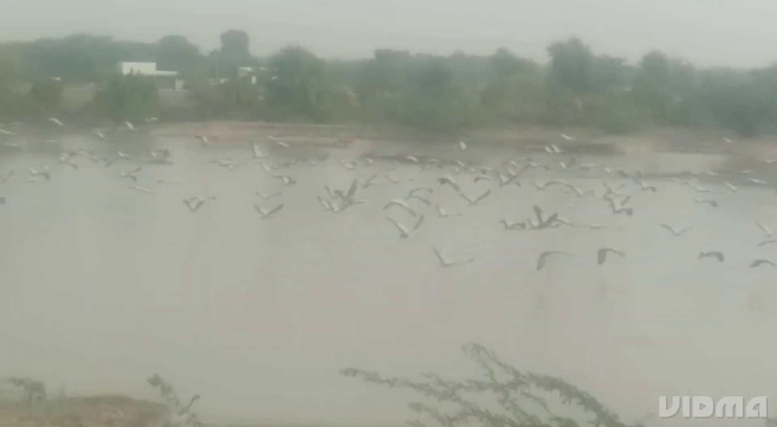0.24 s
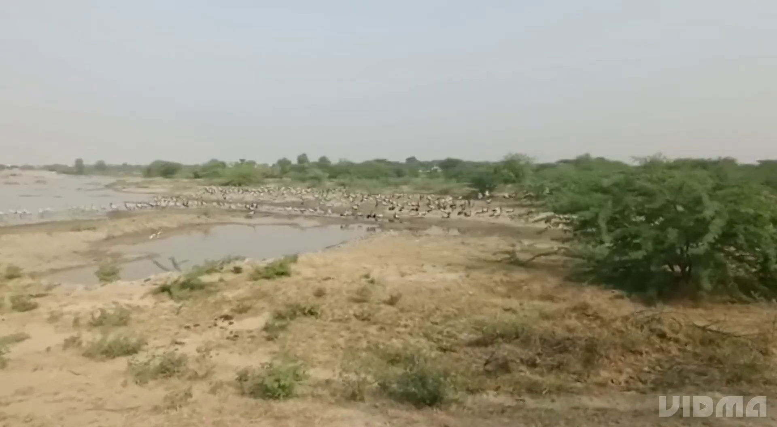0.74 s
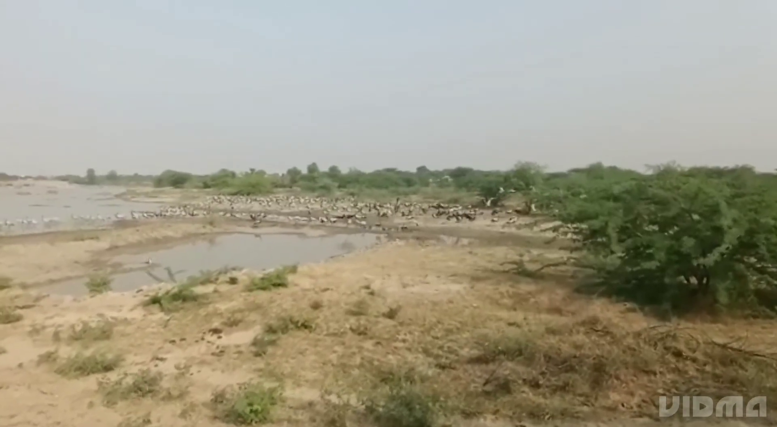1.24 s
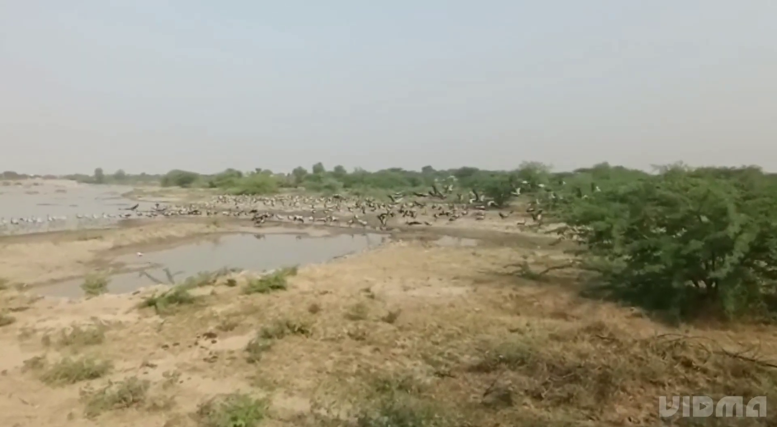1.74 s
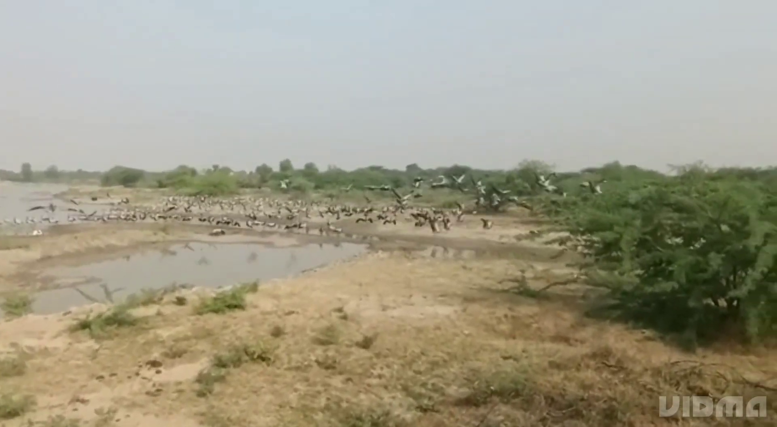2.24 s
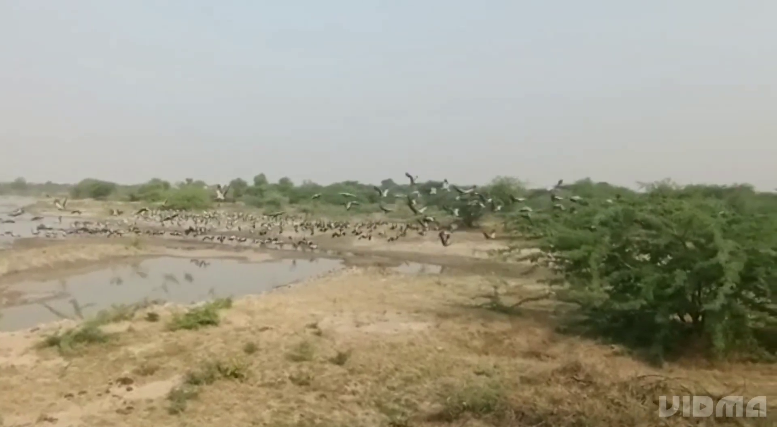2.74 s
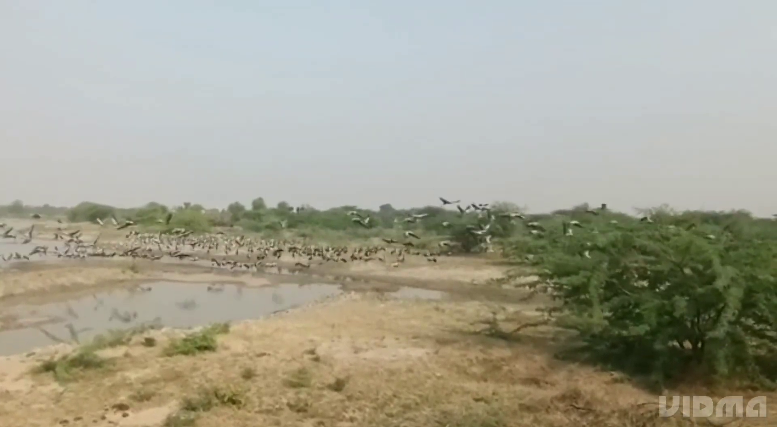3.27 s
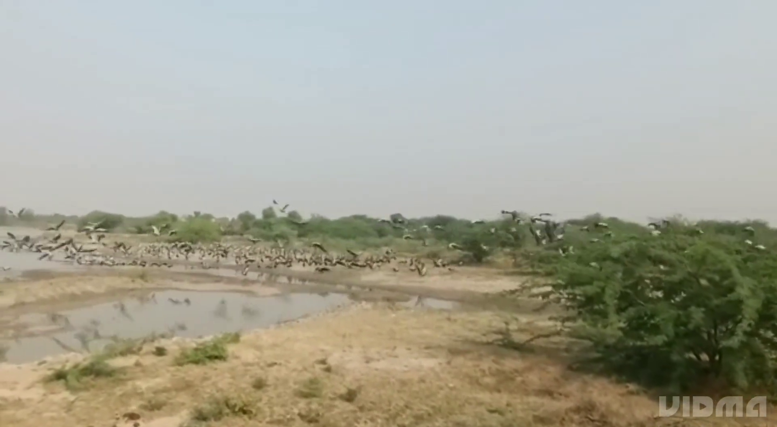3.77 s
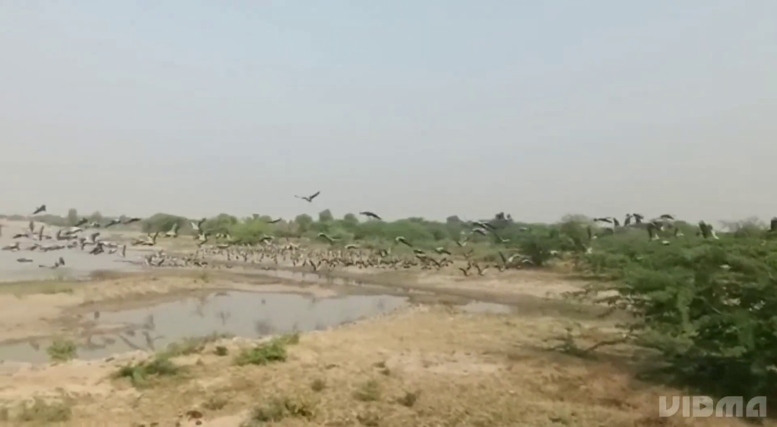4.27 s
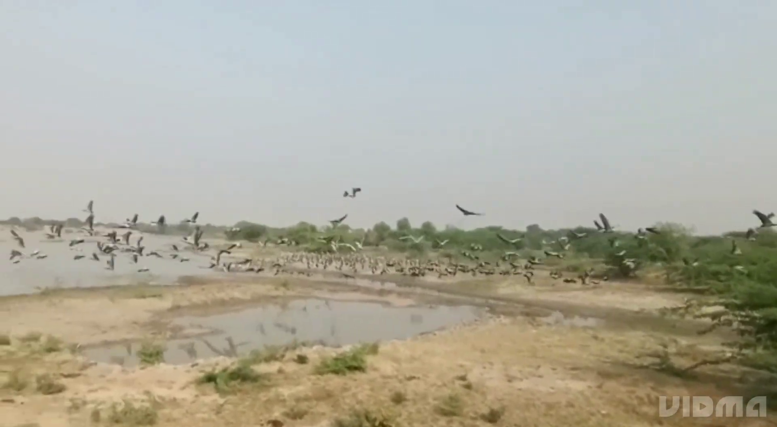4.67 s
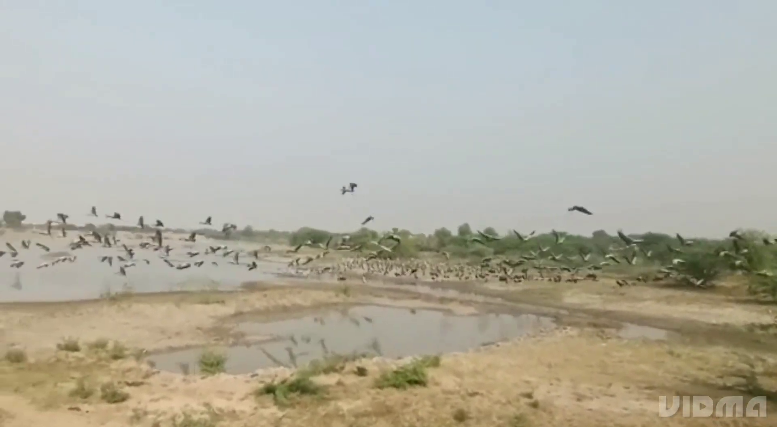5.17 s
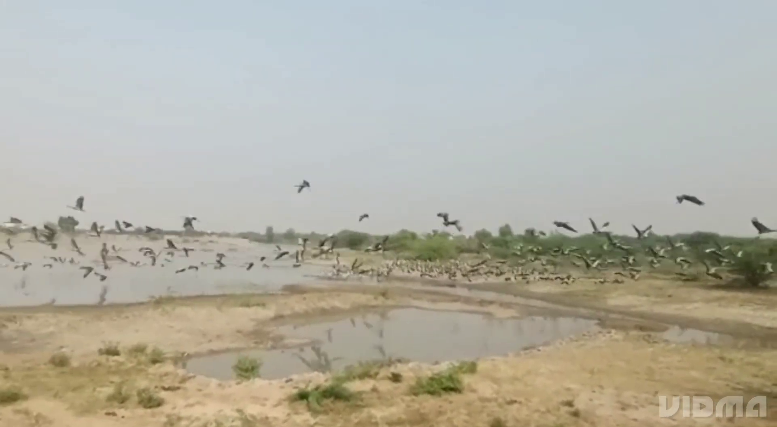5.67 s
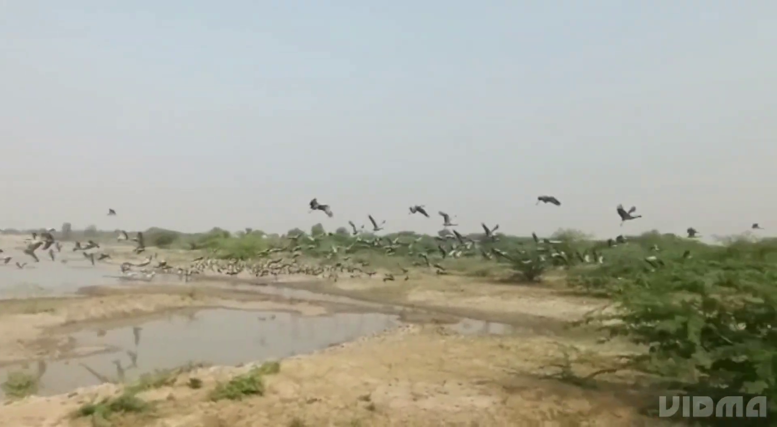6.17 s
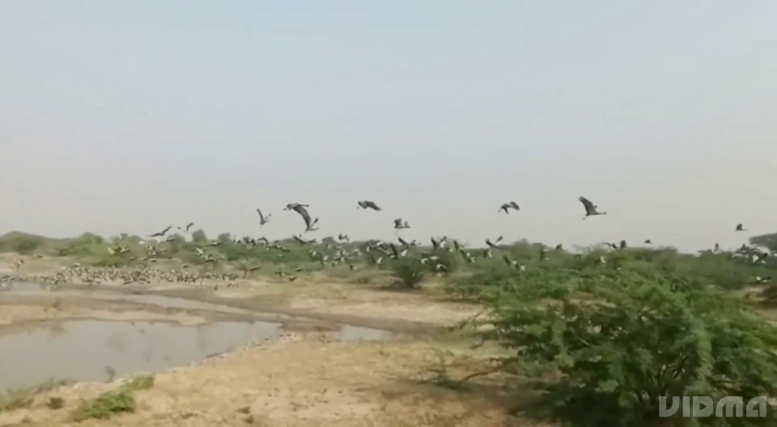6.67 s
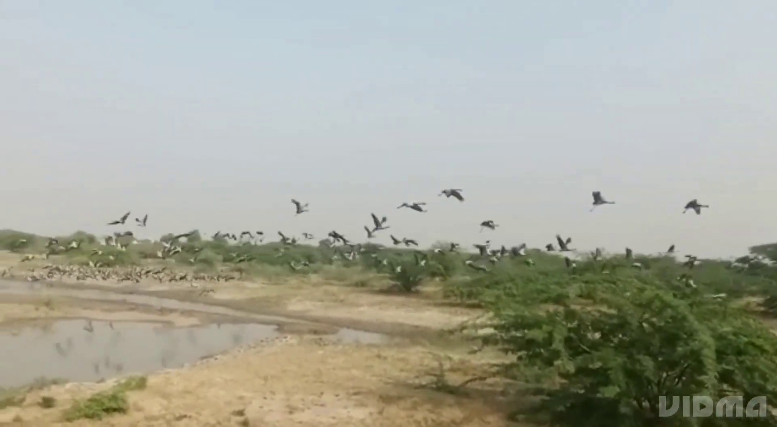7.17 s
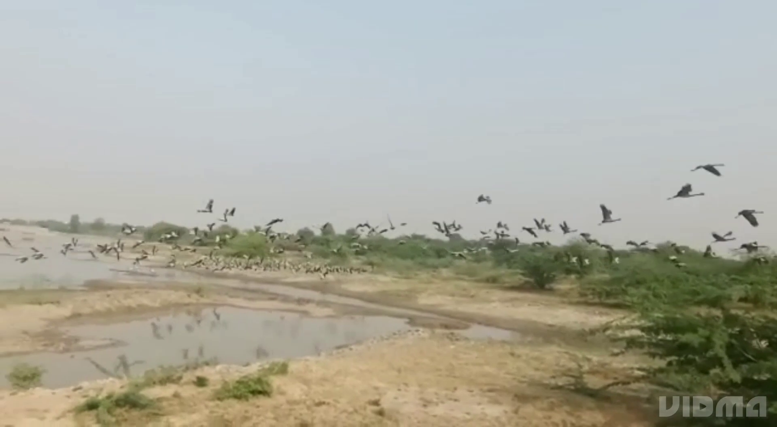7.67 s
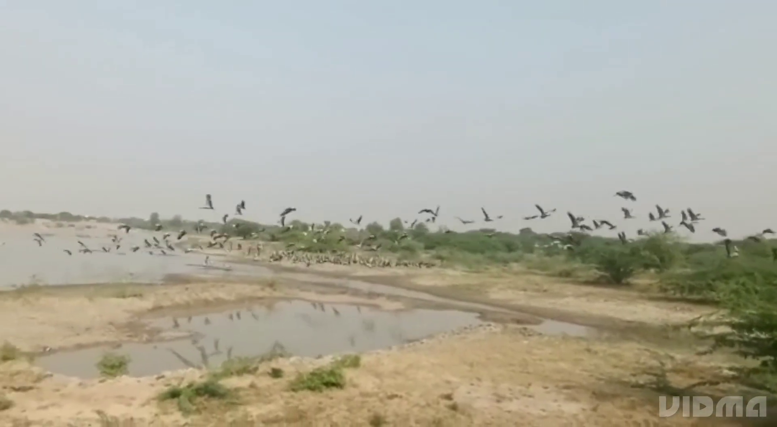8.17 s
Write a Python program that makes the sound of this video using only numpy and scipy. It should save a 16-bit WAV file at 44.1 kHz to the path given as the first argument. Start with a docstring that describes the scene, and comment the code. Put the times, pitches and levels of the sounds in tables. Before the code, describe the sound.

At 0 s a short, falling croak sounds over a faint low hum and soft open-air hush, followed by weak croaks and thin peeps. Around 0.42-0.5 s the level plunges almost to silence, then returns quietly with a small whistle. Near 1.1-1.2 s a few clipped croaks sound, and more scattered ones until 2.3 s, while the hum swells slightly. From about 2.4 s the crane flock breaks out: fast rolled croaks, sharp notes running into sinking rattles, strong near 3.1 s. From 3.3 s hoarse, wobbling trumpets overlap them, thick at 4.2-5.5 s, with distant birds answering in bouts. Calls continue in uneven bursts through 6-7 s. Young birds' high quavering whistles cluster around 7-8.1 s among more trumpets, and calling continues to the end at roughly 8.4 s. Short dull shore echo, wide stereo, occasional soft low thumps on the microphone.

```python
"""A short falling croak over a faint low hum opens the scene; a big flock of cranes calls in growing density.
Adults give rolled croaks (sharp notes into a falling rattle) and hoarse trumpets; young birds whistle.
Croaks are pulsed overtone series, trumpets wobbling overtone series, whistles frequency-modulated sines.
Distant birds answer in bouts; filtered noise makes hum and air, windowed sines make soft thumps.
The level dips briefly near 0.4 s. Table levels precede group trims and channel colour."""
import sys
import numpy as np
from scipy import signal
from scipy.fft import rfft, irfft, next_fast_len
from scipy.io import wavfile
from scipy.ndimage import uniform_filter1d

SR = 44100
rng = np.random.default_rng(int(sys.argv[2]) if len(sys.argv) > 2 else 0)


def persist_wave(psi):
    """Save psi, clipped to +-1, as 16-bit WAV."""
    counts = np.round(np.clip(psi, -1, 1) * 32767).astype(np.int16)
    wavfile.write(sys.argv[1], SR, np.atleast_2d(counts).T)


N = 371322
TIME = np.arange(N) / SR
TOP_HZ = 15900


def undb(db):
    """Decibels to gain."""
    return 10 ** (np.asarray(db) / 20)


def unit(x):
    """Scale to rms 1."""
    return x / np.sqrt(np.mean(x ** 2) + 1e-18)


def curves(table):
    """Each column after the first as a line through time."""
    s, *columns = np.transpose(table)
    return [np.interp(TIME, s, c) for c in columns]


def gain_at(hz, colour):
    """Gain of a (hz, db) spectrum, interpolated over log frequency."""
    f, db = np.transpose(colour)
    return undb(np.interp(np.log(hz + 1e-9), np.log(f), db))


def tint(x, colour):
    """Zero-phase filter with a (hz, db) spectrum."""
    size = next_fast_len(N + 4096)
    gain = gain_at(np.fft.rfftfreq(size, 1 / SR), colour)
    return irfft(rfft(x, size) * gain, size)[..., :N]


def wander(size, rate_hz):
    """Smooth random curve: normal draws at rate_hz, joined by sine-squared ramps."""
    place = np.arange(size) / SR * rate_hz
    points = np.random.default_rng(rng.integers(1 << 30)).standard_normal(int(place[-1]) + 2)
    k = place.astype(int)
    ramp = np.sin(np.pi / 2 * (place - k)) ** 2
    return points[k] + (points[k + 1] - points[k]) * ramp


def swell(u, rise, fall):
    """Sine onset and fade over the shares `rise` and `fall` of a call."""
    return np.sin(np.pi / 2 * np.clip(u / rise, 0, 1)) * np.sin(np.pi / 2 * np.clip((1 - u) / fall, 0, 1))


def add(out, start_s, sound, lag_s=0.000858, lag_spread_s=.00016, pan_db=1.0):
    """Place a source: it reaches the left port later, by a bearing-dependent lag, with a random pan."""
    bearing, side = rng.standard_normal(2)
    paths = [(lag_s + lag_spread_s * bearing, pan_db * side), (0, -pan_db * side)]
    for channel, (late_s, db) in enumerate(paths):
        start = int(np.clip((start_s + late_s) * SR, 0, N))
        part = sound[:N - start]
        out[channel, start:start + len(part)] += part * undb(db)


# Hush of open country: hz, density_db (per Hz, relative)
AIR_COLOUR = [(30, 1), (200, 4.5), (450, 6.5), (700, 3.5), (1300, -13), (2000, -5), (2900, -1),
              (4000, -1.5), (6500, -5), (8000, -13.5), (15000, -48)]


def air(level_db=-70, waver_db=1.0):
    """Hush of open country: coloured stereo noise with a slightly wavering level."""
    hush = unit(tint(rng.standard_normal((2, N)), AIR_COLOUR))
    return hush * undb(level_db + waver_db * wander(N, 12.0))


# Low hum: start_s, low_part_level_db, upper_part_level_db
HUM_LEVELS = [(0.0, -67, -71), (0.25, -79, -72), (0.42, -99, -99), (0.53, -99, -99), (1.3, -76.5, -71),
              (1.62, -65.5, -67.5), (1.96, -64, -68), (2.4, -62.5, -65), (3.101, -65.5, -65.5),
              (3.49, -60.5, -66), (4.04, -66.5, -70), (4.62, -72, -75), (4.9, -73, -74),
              (8.3, -82.5, -81.5)]
# Low part of the hum: hz, density_db (per Hz, relative)
HUM_LOW_COLOUR = [(25, -38.5), (60, -29), (100, -11), (155, 5.5), (210, -2.5), (280, -23), (400, -22),
                  (900, -52)]
# Upper part of the hum: hz, density_db (per Hz, relative)
HUM_UPPER_COLOUR = [(100, -37), (170, -3), (230, 3), (300, -7.5), (400, -42), (560, -19), (720, 10.5),
                    (900, -34), (2000, -57)]


def low_hum(trim_db=5, side_db=-10, waver_db=5.0):
    """Faint hum: two bands of nearly mono noise, each with a wavering level."""
    out = np.zeros((2, N))
    for colour, level_db in zip([HUM_LOW_COLOUR, HUM_UPPER_COLOUR], curves(HUM_LEVELS)):
        mid, side = rng.standard_normal((2, N))
        stereo = mid + undb(side_db) * side * np.array([[1], [-1]])
        out += unit(tint(stereo, colour)) * undb(level_db + trim_db + waver_db * wander(N, 20))
    return out


RING_WIDTH_HZ = 640


def voice(cycles, hz, throat, treble_db, ring_hz=0, ring_db=0, own_db=3.0):
    """Syrinx overtones weighted by each bird's own windpipe: one wave period read at the given phase."""
    size = 2048
    overtones = hz * np.arange(1, int(TOP_HZ / hz) + 1)
    weights = gain_at(overtones, throat) * gain_at(overtones, [(1600, 0.0021), (4500, treble_db)])
    weights = weights * undb(ring_db * np.exp(-((overtones - ring_hz) / RING_WIDTH_HZ) ** 2))
    own_level, own_phase = rng.standard_normal((2, 40))[:, :len(weights)]
    spectrum = weights * undb(own_db * own_level) * np.exp(1.2j * own_phase)
    shape = irfft(np.r_[0, spectrum], size)
    return np.interp(cycles % 1 * size, np.arange(size), shape)


# Windpipe overtone weighting in croaks: hz, gain_db
RATTLE_THROAT = [(1300, 2.5), (2600, -6.5), (3800, -11), (5000, -8.5), (6700, -6), (8000, -24),
                 (10500, -28.5), (13500, -50.5), (15000, -34.5)]


def croak(hz, treble_db, fray=0, gap=0.85, pulse_hz=152, slowing=1.2, jitter=0.03495,
          waver=0.052, uneven_db=1.5, snap_share=0.32):
    """The syrinx snaps open unevenly, slower as pitch sinks: overtones crack briefly, low tone rings on."""
    size = len(hz)
    bird_rate = 1 + .07 * rng.standard_normal()
    rate_hz = pulse_hz * (hz / hz[0]) ** slowing * bird_rate * np.exp(jitter * wander(size, 110.04))
    p = np.cumsum(rate_hz) / SR % 1  # phase within a pulse
    rasp = (.022 + .1 * fray) * wander(size, 1100)
    cycles = p * hz / rate_hz + rasp + waver * wander(size, 166.0)
    tone = voice(cycles, hz[0], RATTLE_THROAT, treble_db)
    body = uniform_filter1d(tone, size=9)
    ring = unit(np.sin(np.pi * p ** 0.83) ** gap)  # larger gap: shorter ring
    snap = unit((p / snap_share) ** 2 * np.exp(-2 * p / snap_share))
    return unit((body * ring + (tone - body) * snap) * undb(uneven_db * wander(size, 146.4)))


NOTE_GAP_S = .032


def note(hz, treble_db, fade_s):
    """One sharp note: a short croak with falling pitch and Gaussian fade, scaled to peak 1."""
    t = np.arange(int(NOTE_GAP_S * SR)) / SR
    envelope = np.exp(-((t - .003) / fade_s) ** 2) * swell(t / t[-1], 0.13, 0.15)
    sound = croak(hz * (1 - 3.09 * t), treble_db) * envelope
    return sound / np.abs(sound).max()


def rattle(length_s, first_hz, last_hz, treble_db, roll_hz=31, roll_depth=0.38):
    """Merged notes: a throbbing croak that frays as the pitch falls."""
    u = np.linspace(0, 1, int(length_s * SR))
    throb = 1 + roll_depth * (1 - u) * np.sin(2 * np.pi * roll_hz * length_s * u)
    sound = croak(first_hz + (last_hz - first_hz) * u ** 2, treble_db, u ** 4, gap=0.73)
    return unit(sound * throb * swell(u, 0.03, 0.26))


NOTE_PEAK_DB, NOTE_TREBLE_DB = 11, 6.5  # relative to the rattle
NOTE_FADE_S, NOTE_STRETCH_S_PER_S = .013, 0.017
CLIMB_PER_S, RATTLE_SAG_PER_S = 0.88, 1.195  # shares of pitch


def roll(notes, rattle_s, hz, treble_db):
    """Evenly spaced notes lengthen and climb in pitch, then merge into a rattle that sinks."""
    lead_s = round(notes) * NOTE_GAP_S
    out = np.zeros(int((lead_s + rattle_s + NOTE_GAP_S) * SR))
    parts = []
    if rattle_s * SR > 2:
        last_hz = hz * (1 - RATTLE_SAG_PER_S * rattle_s)
        parts.append((lead_s, rattle(rattle_s, hz, last_hz, treble_db)))
    for s in np.arange(round(notes)) * NOTE_GAP_S:
        note_hz = hz * (1 - CLIMB_PER_S * (lead_s - s))
        fade_s = NOTE_FADE_S + NOTE_STRETCH_S_PER_S * s
        parts.append((s, note(note_hz, treble_db + NOTE_TREBLE_DB, fade_s) * undb(NOTE_PEAK_DB)))
    for s, part in parts:
        out[int(s * SR):][:len(part)] += part
    return out


# Near rolled croaks: start_s, note_count, rattle_s, pitch_hz, level_db, treble_db
ROLLS = [(0, 0, 0.042, 1380, -39.5, -34), (0.165, 0, .12, 1475, -48, -14.5),
         (0.297, 0, 0.068, 1304, -51.5, -11), (.596, 0, 0.038, 1180, -50, -10),
         (1.056, 1, 0, 1325, -53, -27), (1.108, 1, 0, 1310, -55, -13), (1.132, 1, 0.01, 1370, -38.5, -6.5),
         (1.165, 1, 0, 1354, -36, -5.5), (1.195, 1, 0, 1266, -44, 5.5), (1.479, 1, 0.0023, 1290, -56, -26),
         (1.521, 0, 0.0083, 1331, -44.5, -9), (1.552, 1, 0.13, 1403, -43.5, -12),
         (1.767, 1, 0, 1335, -47, -15), (1.96, 1, 0.012, 1460, -42, -24), (2.121, 0, 0.05, 1300, -46, -14),
         (2.334, 1, 0.0066, 1405, -44, 13), (2.366, 1, 0, 1477, -31, -11),
         (2.416, 4, 0.0013, 1593, -28.5, -6.5), (2.593, 1, 0.00075, 1210, -28, -6.5),
         (2.629, 2, 0.0077, 1329, -41, -3), (2.688, 0, 0.04, 1190, -28.5, -7),
         (2.711, 1, 0.047, 1260, -36.5, 6), (2.816, 1, 0.045, 1416, -35, -7),
         (2.883, 4, 0, 1360, -32, -4.5), (3.037, 1, 0.0026, 1205, -32, -3),
         (3.071, 4, 0.003, 1375, -23.5, -0.5), (3.198, 1, 0.067, 1347, -25.5, -9.5),
         (3.317, 4, 0.029, 1458, -36, -5), (3.575, 2, 0.041, 1443, -39.5, -14.5),
         (3.728, 1, 0.062, 1312, -31.5, -17), (4.101, 3, 0.041, 1470, -41, -11),
         (4.214, 4, 0.063, 1388, -28, -3.5), (4.383, 5, 0.043, 1478, -29.5, -4),
         (4.601, 2, 0.021, 1492, -30.5, 2), (5.077, 1, 0.062, 1487, -30.5, -11),
         (5.186, 2, 0.012, 1444, -27.5, -12), (5.265, 1, 0, 1384, -28.5, -4.5),
         (5.299, 1, 0.024, 1340, -31, -14), (5.349, 1, 0.0042, 1353, -27.5, -8),
         (5.386, 2, 0.076, 1456, -26, -4), (5.742, 4, 0.093, 1443, -31, -10),
         (6.138, 1, 0.067, 1457, -28.5, -16), (6.328, 0, 0.11, 1177, -28, 2.5),
         (6.366, 3, 0.053, 1363, -29, 1.5), (7.094, 1, 0, 1390, -38.5, -1),
         (7.126, 0, 0.16, 1432, -35.5, -0.5), (7.229, 1, 0.011, 1363, -27, -14),
         (7.267, 2, 0.15, 1391, -27.5, -11), (7.581, 0, 0.15, 1640, -36.5, 4.5),
         (8.349, 0, 0.16, 1458, -31.5, -30)]


def near_rolls(trim_db=1):
    """Rolled croaks of the near adults, from syrinx pulses."""
    out = np.zeros((2, N))
    for start_s, notes, rattle_s, hz, level_db, treble_db in ROLLS:
        add(out, start_s - .0015, roll(notes, rattle_s, hz, treble_db) * undb(level_db + trim_db))
    return out


def far_roll(length_s, pitch, treble_db, rattle_hz=1400):
    """A distant bird's roll: one note and a rattle."""
    return roll(1, length_s - NOTE_GAP_S, rattle_hz * (1 + .1 * pitch), treble_db)


def far_trumpet(length_s, pitch, treble_db, trumpet_hz=960, drop=.83, hoarse=0.56):
    """A distant bird's hoarse, sinking trumpet."""
    hz = trumpet_hz * (1 + .2 * pitch)
    return trumpet(length_s, hz, drop * hz, treble_db, hoarse, hz * rng.uniform(1, 3))


def chorus(call, wave_db, colour, treble_db, count=108, excitement=0.73, usual_db=-34, scatter_db=2.0):
    """Many distant birds give one kind of call, brighter when louder, blurred by the way across the shore."""
    out = np.zeros((2, N))
    for k, (when, long, pitch, loud) in enumerate(rng.uniform(-1, 1, (count, 4))):
        start_s = max(0, (k + when) / count * TIME[-1] - .05)
        length_s = .13 + 0.04484 * long
        middle = min(N - 1, int((start_s + length_s / 2) * SR))
        harder_db = np.clip(wave_db[middle] - usual_db, -20, 6)
        sound = call(length_s, pitch, treble_db + excitement * harder_db)
        add(out, start_s, sound * undb(scatter_db * loud))
    out = tint(shore(out), colour)
    # level out the sum before imposing the bouts
    loudness = np.sqrt(uniform_filter1d(np.mean(out ** 2, axis=0), SR // 16) + 1e-3)
    return out / loudness * undb(wave_db)


# Bouts of distant calls: start_s, length_s, level_db, trumpeter_share (0-1)
BOUTS = [(0, 0.56, -52, 0.3), (2.326, 0.15, -39.5, 0.15), (2.424, 0.19, -32, 0.6),
         (2.633, 0.44, -34.5, 0.28), (3.181, 0.18, -31.5, 0.19), (3.268, 0.21, -33.5, 0.8),
         (3.382, 0.68, -49.5, 0.35), (3.657, 0.24, -31, 0.48), (4.082, 0.18, -33.5, 0.77),
         (4.199, 0.65, -31, 0.47), (4.834, 0.87, -41.5, 0.5), (5.083, 0.29, -33, 0),
         (5.395, 0.18, -30.5, 0.03), (5.663, 0.18, -34.5, 0.52), (5.722, 0.35, -29.5, 0.27),
         (6.035, 0.26, -37, 0.27), (6.286, 0.23, -28, 0.19), (6.51, 0.39, -59, 0.25),
         (6.661, 0.2, -29, 0.83), (6.802, 1.9, -42, 0.34), (7.106, 0.19, -38, 0),
         (7.265, 0.21, -28.5, 0.07), (7.454, 0.28, -38.5, 0.38), (7.73, 0.21, -33, 0.96),
         (7.936, 0.16, -33, 0.93), (8.175, 0.41, -34, 0.28)]
BOUT_ATTACK_S, BOUT_RELEASE_S = 0.03, 0.059  # birds join in faster than they drop out
MURMUR_DB = -73  # flock between bouts


def bouts():
    """Rolling and trumpeting levels in dB: each bout swells, holds and dies away over a faint murmur."""
    power = np.outer([.8, .2], np.full(N, undb(MURMUR_DB) ** 2))
    for start_s, length_s, level_db, share in BOUTS:
        attack_end_s = start_s + min(BOUT_ATTACK_S, length_s / 2)
        release_s = start_s + max(length_s - BOUT_RELEASE_S, length_s / 2)
        corners_s = [start_s, attack_end_s, release_s, start_s + length_s]
        share = np.clip(share, 0, 1)
        envelope = np.interp(TIME, corners_s, [0, undb(level_db), undb(level_db), 0])
        power += np.outer([1 - share, share], envelope ** 2)
    return 10 * np.log10(power)


# Summed distant rolls: hz, gain_db
FAR_ROLL_COLOUR = [(700, -0.5), (1000, 7.5), (1350, -1), (1950, 13), (2500, 5.5), (3200, -2.5), (5000, 3),
                   (9000, -2.5), (15000, -0.5)]
# Summed distant trumpets: hz, gain_db
FAR_TRUMPET_COLOUR = [(600, 4), (950, -2), (1400, 10), (2000, -3), (2600, -2), (3300, 4.5), (5000, 1),
                      (9000, 6.5), (15000, -6)]


def flock(roll_db=2.5, trumpet_db=4.0):
    """The rest of the flock: a rolling and a trumpeting chorus, summed."""
    rolling_db, trumpeting_db = bouts()
    rolling = chorus(far_roll, rolling_db, FAR_ROLL_COLOUR, treble_db=0.0)
    trumpeting = chorus(far_trumpet, trumpeting_db, FAR_TRUMPET_COLOUR, treble_db=-0.5)
    return rolling * undb(roll_db) + trumpeting * undb(trumpet_db)


# Soft thumps on the microphone: start_s, pitch_hz, level_db
THUMPS = [(0.039, 130, -54), (0.224, 124.4, -55.5), (0.319, 147, -53), (1.201, 92, -58),
          (3.016, 151.4, -47), (4.551, 156, -47)]


def thumps(length_cycles=4.9):
    """Soft thumps: a few cycles of a low sine under a Hann window."""
    out = np.zeros((2, N))
    for start_s, hz, level_db in THUMPS:
        t = np.arange(int(length_cycles / hz * SR)) / SR
        add(out, start_s, unit(np.sin(2 * np.pi * hz * t) * np.hanning(len(t))) * undb(level_db))
    return out


def whistle(length_s, first_hz, middle_hz, last_hz, hoarse=0, overtone_db=-20, quaver=0.012, flutter_hz=210):
    """A thin, quavering peep; throat flutter splits a hoarse one into side tones."""
    u = np.linspace(0, 1, int(length_s * SR))
    hz = np.polyval(np.polyfit([0, .5, 1], [first_hz, middle_hz, last_hz], 2), u)
    flutter = np.sin(2 * np.pi * flutter_hz * length_s * u + wander(len(u), 80))
    flutter = flutter + .6 * wander(len(u), 500)
    phase = 2 * np.pi * np.cumsum(hz * (1 + quaver * wander(len(u), 420))) / SR + 1.5 * hoarse * flutter
    tone = np.sin(phase) + undb(overtone_db) * np.sin(2 * phase)
    return unit(tone * undb(5.4 * wander(len(u), 170)) * swell(u, 0.06, 0.15))


# Whistles of young birds: start_s, length_s, first_hz, middle_hz, last_hz, level_db, hoarseness (0-1)
WHISTLES = [(.17, 0.15, 3930, 3740, 3530, -59, 0.4), (0.051, 0.13, 2900, 2800, 2660, -62.5, 0.6),
            (0.497, 0.095, 3180, 2900, 3100, -46, 0.32), (0.673, 0.035, 2740, 3010, 3100, -56.5, 0.1),
            (1.993, 0.069, 3030, 3220, 3880, -42.5, 0.37), (2.045, 0.037, 2790, 2520, 2370, -52.5, 0.1),
            (2.421, 0.088, 3490, 3400, 2800, -36.5, 0.1), (3.391, 0.096, 4290, 4030, 3430, -44, 0.3),
            (3.487, 0.09, 2725, 2595, 2600, -50.5, 0.2), (4.341, 0.067, 4120, 3270, 3140, -38, 0.5),
            (4.961, 0.066, 3100, 3770, 3360, -36.5, 0), (5.009, 0.039, 3330, 3550, 4000, -37, 0.1),
            (5.059, 0.047, 3273, 2996, 2850, -41, 0.08), (6.24, 0.085, 3002, 3275, 3350, -48, 0.2),
            (6.571, 0.054, 3017, 2880, 2746, -52, 0.3), (6.924, 0.068, 3070, 3160, 3260, -46, 0.1),
            (6.983, 0.065, 3300, 3380, 3680, -39, 0.1), (6.997, 0.062, 3370, 3110, 3070, -46, 0),
            (7.054, 0.0532, 3740, 3660, 3360, -47, 0.2), (7.517, 0.059, 3950, 3760, 3730, -41.5, 0),
            (7.734, 0.062, 3450, 3500, 3350, -42, 0.3), (7.802, 0.14, 3370, 3140, 2974, -36.5, 0.4),
            (7.852, 0.059, 3480, 3320, 3150, -43, 0.4), (7.944, 0.045, 2830, 2760, 2670, -42, 0.4),
            (7.94, .07, 4350, 4370, 4150, -46, 0.8), (8, 0.09, 4020, 3880, 3920, -37, 0.5),
            (7.949, 0.13, 3790, 3540, 3360, -42.5, 0.4), (8.079, 0.082, 3900, 3930, 3620, -43.5, 0.5)]


def young_whistles(trim_db=2):
    """Peeps of the young birds: gliding, fluttering near-sines."""
    out = np.zeros((2, N))
    for start_s, length_s, first_hz, middle_hz, last_hz, level_db, hoarse in WHISTLES:
        sound = whistle(length_s, first_hz, middle_hz, last_hz, hoarse)
        add(out, start_s, sound * undb(level_db + trim_db))
    return out


# Faint low tones from far off: start_s, length_s, pitch_hz, level_db
FAR_TONES = [(0.076, 0.17, 335, -60), (.24, 0.205, 345, -66.5), (0.91, 0.063, 643, -50)]


def far_tones():
    """Faint, quavering low tones whose pitch sags at the end."""
    out = np.zeros((2, N))
    for start_s, length_s, hz, level_db in FAR_TONES:
        add(out, start_s, whistle(length_s, hz, hz, .96 * hz) * undb(level_db))
    return out


# Windpipe overtone weighting in trumpets: hz, gain_db
TRUMPET_THROAT = [(700, 7.5), (1000, 1), (1700, 1), (2500, -2), (3300, -10), (4800, -0.5), (6700, -4.5),
                  (8000, -23.5), (13500, -42), (15000, -42)]
RING_DB = 7  # boost of overtones near a windpipe resonance


def trumpet(length_s, first_hz, last_hz, treble_db, hoarse, ring_hz, flap_depth=0.62, uneven_db=4.5, tire_db=4):
    """A sagging tone catches and wobbles; hoarse membranes shake and flap about every three cycles."""
    u = np.linspace(0, 1, int(length_s * SR))
    hoarse = np.clip(hoarse, 0, 1)
    sag = u ** rng.uniform(1.2, 2.4)
    wobble = 1 + (.006 + .013 * hoarse) * wander(len(u), 80)
    cycles = np.cumsum((first_hz + (last_hz - first_hz) * sag) * wobble) / SR
    flap = np.sin(2 * np.pi * cycles / rng.uniform(2.8, 4) + wander(len(u), 90))  # adds side tones
    scatter = .014 * wander(len(u), 900) + .08 * wander(len(u), 190) + .05 * flap
    tone = voice(cycles + hoarse * scatter, first_hz, TRUMPET_THROAT, treble_db, ring_hz, RING_DB)
    shake = undb(uneven_db * np.sqrt(hoarse) * wander(len(u), 194.3))
    shake = shake * (1 + flap_depth * np.sqrt(hoarse) * flap)
    catch = 1 + .38 * np.clip(wander(len(u), 70), -2, 1.3)
    return unit(tone * shake * catch * undb(-tire_db * sag) * swell(u, 0.11, 0.15))


# Near trumpets: start_s, length_s, pitch_hz, sag_per_s (share), level_db, treble_db,
# hoarseness (clipped to 0-1), ring_hz
TRUMPETS = [(1.979, 0.046, 821, 0.78, -34, -4.5, 0.4, 1630), (2.525, 0.14, 850, 1.88, -31, -18, 0.9, 1699),
            (2.634, 0.072, 848, 0.95, -38.5, 7.5, 0.7, 2500),
            (3.284, 0.12, 916, 0.57, -34, -15, 0.72, 2720),
            (3.375, 0.15, 796, 1.31, -34.5, 1.5, 0.77, 1446),
            (3.678, 0.046, 926, 0.24, -30.5, 10, 0.2, 2880), (3.734, .11, 1042, 1.45, -36, -8, 0.47, 3150),
            (3.774, 0.17, 894, 1.65, -32, -5, 0.94, 1010), (3.927, 0.053, 1692, 1.9, -33.5, -3, 0.09, 1650),
            (4.264, 0.13, 808, 0.93, -34, -7, 0.65, 1277), (4.446, 0.17, 1008, 1.4, -33.5, 12, 0.5, 1000),
            (4.616, .13, 868, 1.56, -29, 5.5, 0.84, 2500), (4.757, 0.17, 963, 1.02, -29.5, -7, 0.77, 1000),
            (4.878, 0.15, 932, 0.94, -37, -1.5, 0.3, 900), (4.96, 0.14, 895, 2, -41, -16, 0, 850),
            (5.106, 0.051, 1408, 1, -39, -14, 0.23, 1400), (5.147, 0.073, 770, 0.99, -33.5, -12, 0, 780),
            (5.2, 0.1, 1480, 1.6, -28, -5, 0.04, 1400), (5.281, 0.087, 1227, 0.81, -32.5, -8, 0, 1200),
            (5.83, .15, 1540, 1.284, -32.5, -12, 0.65, 1446),
            (5.918, 0.16, 1206, 1.2, -33.5, -2, 1.02, 2380),
            (6.093, 0.15, 1202, 0.68, -32.5, -2.5, 0.56, 2360), (6.33, 0.1, 1175, 0.63, -31, 5, 0.65, 1190),
            (6.449, 0.084, 1266, 1.26, -30, -22, 0.5, 1180),
            (6.666, 0.13, 1011, 0.74, -30.5, -0.5, 0.45, 1400),
            (6.69, 0.11, 872, 0.94, -34.5, -4, 0.56, 1700), (6.743, 0.15, 831, 1.2, -30.5, -2.5, 0.38, 860),
            (6.776, 0.14, 1350, 0.79, -35.5, -12, 0.13, 3940),
            (6.873, 0.12, 871, 1.5, -35, -16.5, 0.37, 880), (7.488, 0.1, 1191, 0.43, -32, 4, 0.27, 4762),
            (7.503, 0.11, 1099, 2, -32, 0, 0.38, 2220), (7.639, 0.12, 1221, 1.1, -37.5, 11, 0.45, 2400),
            (7.739, 0.124, 1006, 0.86, -30, -7.5, 0.54, 1713),
            (7.82, 0.12, 818.4, 0.34, -28.5, -6.5, 0.58, 1660),
            (7.85, 0.12, 860, 2.34, -31.5, -12, 0.72, 750),
            (7.99, 0.109, 1246, 1.74, -32.5, -11.5, 0.45, 1100),
            (8.189, 0.109, 1328, 1.83, -31.5, 1, 0, 1300)]


def near_trumpets(trim_db=0):
    """Hoarse trumpets of the near adults, coloured by the windpipe."""
    out = np.zeros((2, N))
    for start_s, length_s, hz, sag_per_s, level_db, treble_db, hoarse, ring_hz in TRUMPETS:
        last_hz = hz * (1 - sag_per_s * length_s)
        sound = trumpet(length_s, hz, last_hz, treble_db, hoarse, ring_hz)
        add(out, start_s, sound * undb(level_db + trim_db))
    return out


def shore(x, echo_db=-11, t60_s=0.23):
    """Ground and bushes scatter a short, dull echo: convolution with decaying noise."""
    t = np.arange(SR // 3) / SR
    tail = rng.standard_normal((2, len(t))) * np.exp(-np.log(1000) * t / t60_s) * (t > .003)
    tail = tail / np.sqrt(np.sum(tail ** 2, axis=1, keepdims=True))
    echo = signal.fftconvolve(x, tail, axes=1)[:, :N]
    return x + undb(echo_db) * tint(echo, [(2000, 0), (12000, -6)])


def scene(low_edge_hz=640):
    """High-passed birds with shore echo, over hum, air, far tones and thumps."""
    country = air() + low_hum() + thumps() + far_tones()
    birds = near_rolls() + flock() + young_whistles() + near_trumpets()
    high_pass = signal.butter(6, low_edge_hz, "high", fs=SR, output="sos")
    return shore(signal.sosfilt(high_pass, birds)) + country


# Brief dip, held at the end values outside it: start_s, gain_db
DIP = [(.413, -2), (.42, -43), (.495, -65), (.505, -32.5), (.73, -9.5)]


def record(dry):
    """Each port has its own colour; the level dips once, returns lower, and the top is cut."""
    # hz, gain_db
    left = tint(dry[0], [(60, 15.3), (200, 8.4), (700, 6.6), (1300, 11.53), (2400, 14.3),
                         (4400, 7.0), (8000, 3.75), (15000, 15.4)])
    right = tint(dry[1], [(60, 17.5), (200, 3.0), (700, 0.5), (1300, 0.0), (2400, 8.0),
                          (4400, 5.5), (8000, 4.0), (15000, 9.5)])
    dip_gain = undb(curves(DIP)[0])
    low_pass = signal.ellip(8, .2, 70, TOP_HZ, fs=SR, output="sos")
    return signal.sosfilt(low_pass, np.array([left, right]) * dip_gain)


dry = scene()
out = record(dry)
persist_wave(out)
```